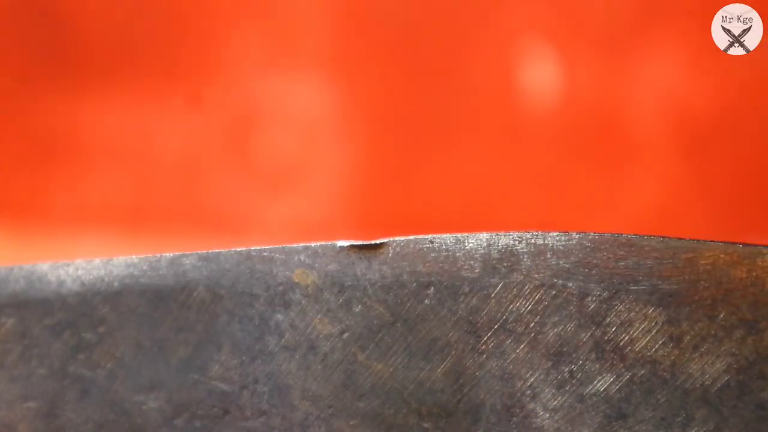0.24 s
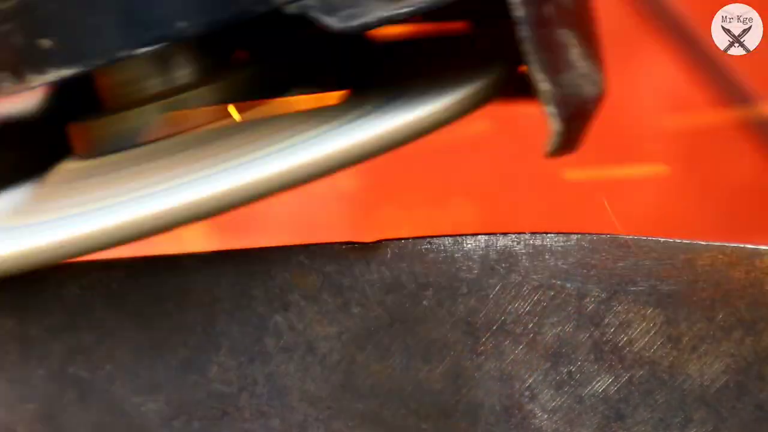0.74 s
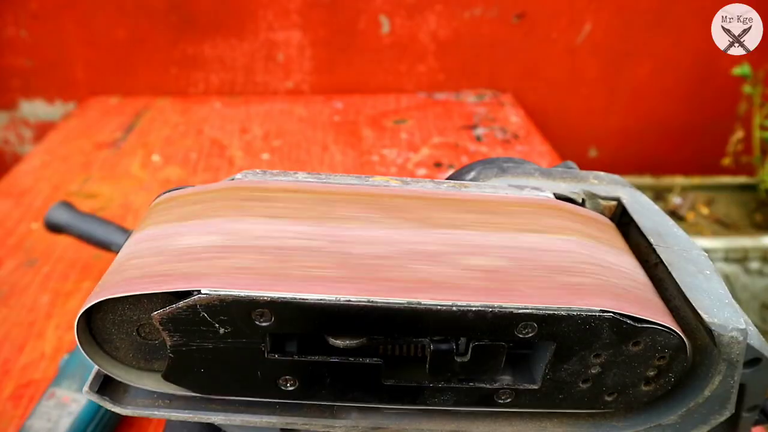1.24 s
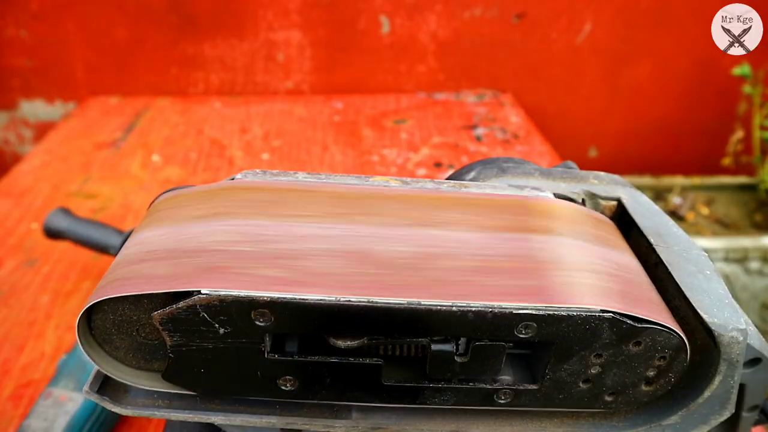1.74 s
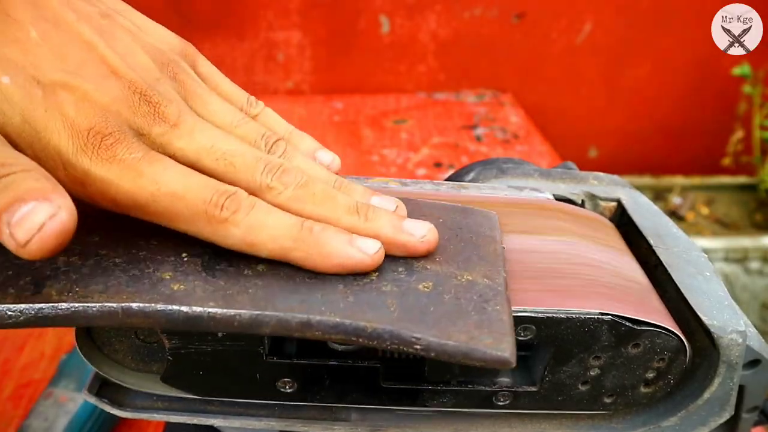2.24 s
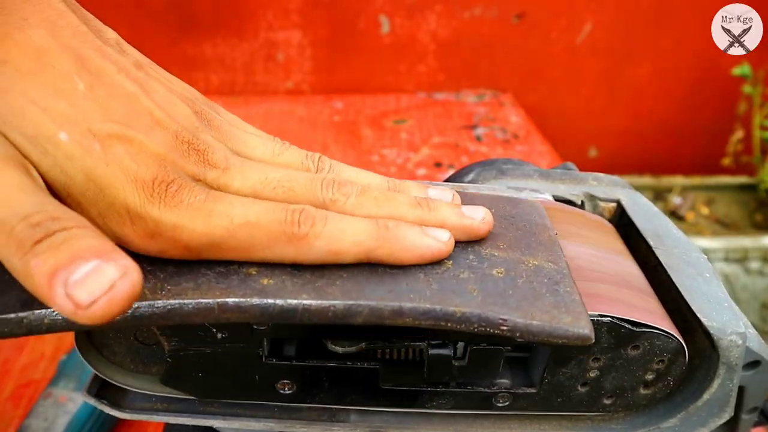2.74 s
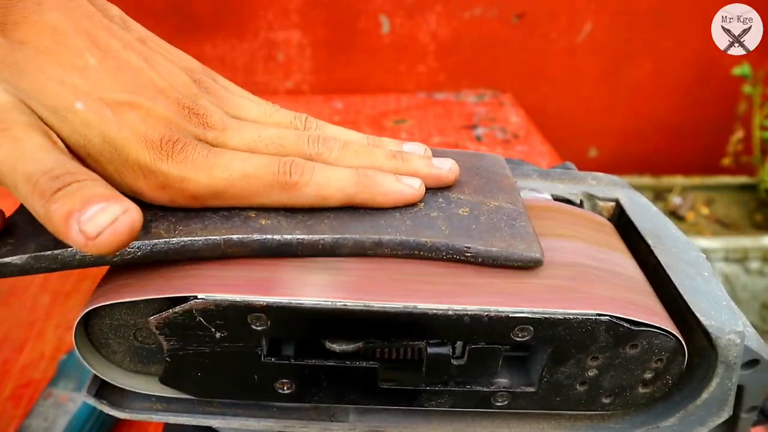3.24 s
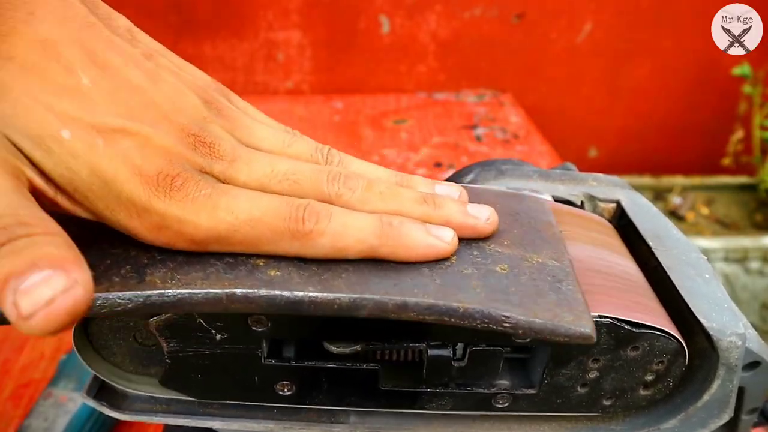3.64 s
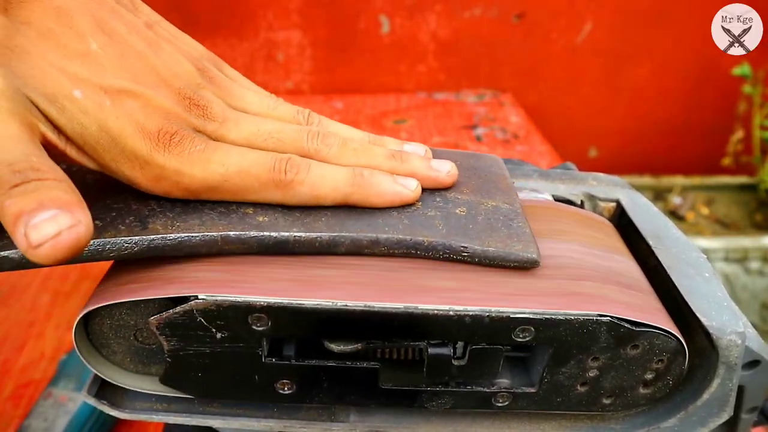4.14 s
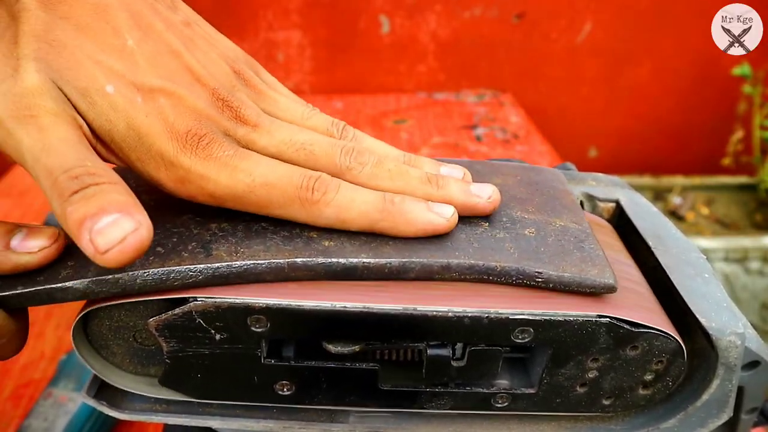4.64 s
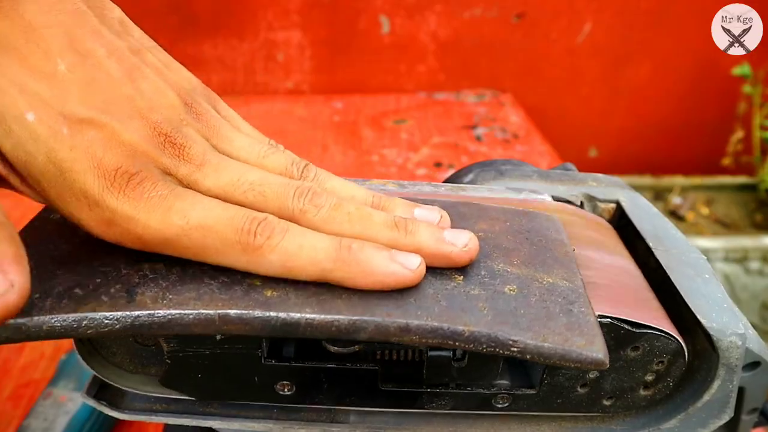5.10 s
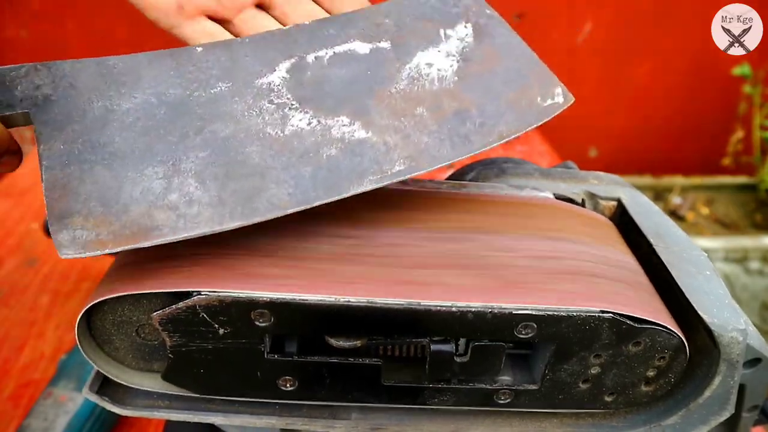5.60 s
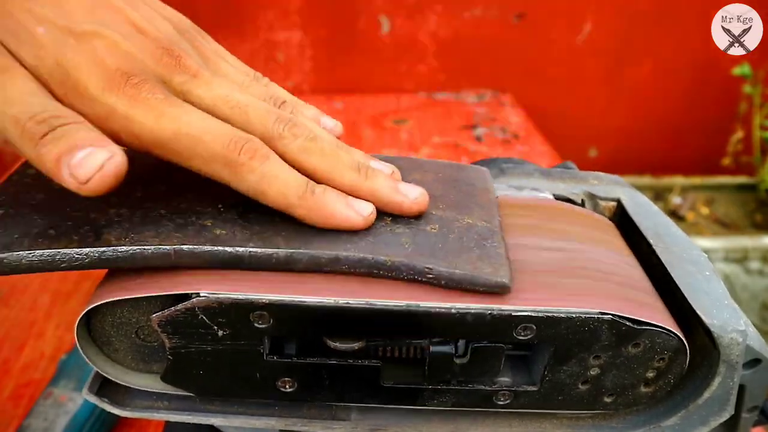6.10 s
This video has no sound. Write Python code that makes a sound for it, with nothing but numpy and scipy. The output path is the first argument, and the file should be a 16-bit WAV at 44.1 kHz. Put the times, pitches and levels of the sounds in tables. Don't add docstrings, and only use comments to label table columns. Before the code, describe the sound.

An angle grinder whirrs and rasps a ringing steel blade twice, then a belt sander whines and roars, bogging down as a blade is pressed on.

```python
import sys
import numpy as np
from scipy import signal
from scipy.fft import rfft, irfft
from scipy.io import wavfile
from scipy.ndimage import uniform_filter1d, map_coordinates

SR = 44100
rng = np.random.default_rng(int(sys.argv[2]) if len(sys.argv) > 2 else 0)


def rack_gain(trim_db):
    fader = np.asarray(trim_db, float)
    return 10 ** (fader / 20)


def wav_record(signal):
    frames = np.transpose(np.atleast_2d(signal))
    bounded = np.clip(frames, -1, 1)
    quanta = np.round(bounded * 32767).astype(np.int16)
    wavfile.write(sys.argv[1], SR, quanta)


N = 280476
TIME = np.arange(N) / SR
GRINDER_END_S, SANDER_START_S = 1.0285, 1.0372
SETTLE_S = .32
FLUTTER_DB, LOW_FLUTTER_DB = 1.25, .9
THROB_HIGH_DB = (1.8, .7)
LOCKED_HZ = 3700

# [start_s, pressure_db, low_rasp_db (relative)]
STROKES = [
    [(0.0, -28.5, -15), (0.044, -40, -15), (0.114, -39, -21), (0.128, -34, -23), (0.134, -52, -20),
     (0.15, -41, -22), (0.16, -62, -6)],
    [(0.556, -34, 2), (0.628, -33, 4.5), (0.65, -32, -5), (0.675, -31.5, -8), (0.878, -32, -5.5),
     (0.912, -39.5, 1), (0.93, -34.5, -23), (0.978, -35.5, -18), (0.998, -60, -10)],
]
# [time_s, turns_per_s]
DISC = [(0, 107.5), (.03, 105.2), (.06, 103), (.085, 102.8), (.12, 104.5), (.16, 106), (.555, 122.5),
        (.607, 120), (.637, 117.7), (.68, 113), (.742, 105.2), (.8, 100.5), (.84, 98.6), (.89, 96.5),
        (1.0, 97)]
# [pitch_hz, likeness (1 = same)]
GRINDER_SAME = [(60, 1), (1400, 1), (2200, .97), (3000, .92), (4300, .65), (6000, .3), (8000, -.1),
                (14000, -.7)]
# [pitch_hz, left_minus_right_db]
SANDER_LEAN = [(130, 0), (235, 2), (380, -0.5), (630, 1), (1380, 3), (3030, -1), (6640, -0.5), (14600, 1)]
# [time_s, tooth_mesh_hz]
MESH = [(1.04, 2208), (1.8, 2215), (2.11, 2217), (2.3, 2147), (2.5, 2098), (2.8, 2048), (3.0, 2032),
        (3.6, 2015), (4.15, 2006), (4.4, 1971), (4.68, 1991), (5.185, 1980), (5.23, 2068), (5.322, 2149),
        (5.466, 2195), (5.68, 2221), (6.06, 2224), (6.36, 2134)]
# [laid_down_s, lifted_s]
PRESSES = [
    (2.13, 5.17),
    (6.08, 6.5),
]
# [start_s, peak_db, pitch_hz]
SLAPS = [(1.054, -20, 615), (1.104, -14, 1170), (1.129, -17, 716), (1.365, -15, 816), (1.473, -29, 789),
         (1.516, -14, 770), (1.596, -15, 766), (1.683, -13.5, 1150), (1.913, -15, 805), (1.967, -15, 780),
         (2.075, -19, 730), (2.098, -21, 748), (2.282, -21, 720), (2.37, -18, 900), (2.456, -16, 1060),
         (2.495, -14, 766), (2.683, -17, 890), (2.708, -28, 1130), (2.989, -16, 1180), (3.021, -12.5, 1070),
         (3.053, -16, 1090), (3.153, -16, 750), (3.242, -19, 730), (3.272, -16, 1190), (3.336, -12, 760),
         (3.4, -13, 1050), (3.7, -11, 790), (3.731, -19, 780), (3.751, -19, 1050), (3.847, -12.5, 814),
         (3.935, -13, 1180), (4.004, -12, 825), (4.075, -12, 1120), (4.105, -19, 1180), (4.166, -14, 1040),
         (4.23, -14, 770), (4.465, -11, 1190), (4.527, -14, 790), (4.569, -13, 785), (4.602, -17, 800),
         (4.861, -14, 777), (4.958, -14, 710), (5.232, -9.5, 1080), (5.258, -16, 710), (5.287, -19, 800),
         (5.342, -16, 897), (5.393, -15, 990), (5.582, -10, 755), (5.65, -11, 710), (5.677, -17, 1010),
         (5.838, -18, 1020), (5.931, -17, 1030), (5.983, -17, 740), (6.12, -26, 770), (6.208, -25, 774),
         (6.277, -24, 1120)]


def evened(x):
    return x / np.sqrt(np.mean(x ** 2) + 1e-20)


def read(points, hz):
    f, value = np.transpose(points)
    return np.interp(np.log(hz + 1), np.log(f + 1), value)


def columns(rows, at=TIME):
    first, *rest = np.transpose(rows)
    return [np.interp(at, first, c) for c in rest]


def curve(rows, t=TIME):
    return columns(rows, t)[0]


def add(mix, s, sound):
    start = round(s * SR)
    mix[:, start:start + sound.shape[1]] += sound


def high_pass(x, hz):
    return signal.sosfilt(signal.butter(2, hz, "high", fs=SR, output="sos"), x)


def wander(per_s, size=N):
    steps = rng.standard_normal(int(size / SR * per_s) + 3)
    return map_coordinates(steps, [np.arange(size) / SR * per_s], order=3)


def complex_wander(per_s, size=N):
    return wander(per_s, size) + 1j * wander(per_s, size)


def swell(s, spread_s):
    return np.exp(-.5 * ((TIME - s) / spread_s) ** 2)


def noise(colour_db, same, lean, patchy_db, size=N, wide=10):
    frames = size // 256 + 5
    hz = np.fft.rfftfreq(1024, 1 / SR)[:, None]
    a, b, c, d, patches = rng.standard_normal((frames, 513, 5)).T
    patches = uniform_filter1d(patches, size=wide, axis=0)
    patches = evened(uniform_filter1d(patches, size=10, axis=1))
    like = np.clip(read(same, hz), -1, 1)
    tilt = rack_gain(read(lean, hz) / 2)
    left = a + 1j * b
    right = like * left + np.sqrt(1 - like ** 2) * (c + 1j * d)
    z = np.array([left * tilt, right / tilt])
    z *= rack_gain(colour_db(np.arange(frames) * 256 / SR, hz) + patchy_db * patches)
    return signal.istft(z, nperseg=1024, noverlap=768)[1][:, :size]


def flutter():
    return np.cos(2 * np.pi * SR / 1024 * TIME + 2.15)


def knocks(rows):
    out = np.zeros(N)
    for s, db, hz, cycles in rows:
        u = np.arange(int(5 * cycles / hz * SR)) * hz / SR
        blow = high_pass(np.sin(2 * np.pi * u) * np.exp(-2 * u / cycles), hz / 3)
        out[round(s * SR):][:len(u)] -= rack_gain(db) * blow / abs(blow).max()
    return out


def handling_thumps():
    # [start_s, peak_db, pitch_hz, length_cycles]
    thump_rows = [
        (1.41, -46, 130, 1.),
        (2.27, -44, 170, 1.),
        (2.962, -29, 220, 1.),
        (3.692, -41, 170, 1.),
        (3.96, -29, 220, 1.),
        (4.205, -39, 200, 1.),
        (4.69, -45, 170, 1.),
    ]
    return rack_gain(np.array([[2.5], [-2.5]])) * knocks(thump_rows)


def grinder_knocks():
    # [start_s, peak_db, pitch_hz, length_cycles]
    knock_rows = [(.207, -29, 3290, 1.3), (.232, -29, 2520, 1.3), (.276, -27, 3330, 1.3),
                  (.326, -27, 2550, 1.3), (.305, -24, 3000, 1.2), (.400, -22, 3040, 1.6),
                  (.552, -27, 1500, 1.3), (.5578, -12.5, 850, 1.05), (.5995, -23, 750, 1.2),
                  (.622, -25, 750, 1.5), (1.0378, -18, 1200, 1.05)]
    return knocks(knock_rows)


def grit(colour, size, patchy_db=2.5, wide=10, same=GRINDER_SAME):
    # [pitch_hz, left_minus_right_db]
    grinder_lean = [(60, 0), (14000, 0)]
    return evened(noise(lambda _, hz: read(colour, hz), same, grinder_lean, patchy_db, size, wide))


def high_spot(size):
    # [time_s, level_db]
    spot_level = [(0, -39), (.025, -44), (.08, -37), (.095, -39), (.13, -42), (.15, -49), (.16, -62),
                  (.553, -62), (.56, -48), (.65, -39), (.7, -41), (.88, -50), (.91, -62)]
    t = TIME[:size]
    angle = 2 * np.pi * np.cumsum(curve(DISC, t)) / SR - 1
    blows = np.zeros(size)
    for k in range(13, 24):
        blows += rack_gain(2.5 * wander(20, size)) * np.cos(k * angle + .5 * wander(25, size))
    return rack_gain(curve(spot_level, t)) * evened(blows)


def whirr(size):
    # [time_s, level_db]
    whirr_level = [(0.0, -31), (0.15, -34), (0.2, -42.5), (0.21, -36), (0.35, -31), (0.438, -29),
                   (0.524, -28.5), (0.53, -34.5), (0.55, -30), (0.56, -28.5), (0.985, -44), (1.028, -40)]
    # [pitch_hz, level_db (per Hz)]
    whirr_colour = [(60, -58), (300, -30.5), (700, -15), (1400, -10), (2300, -9.5), (3400, -7), (5000, -14),
                    (7000, -23.5), (10500, -35), (15000, -41)]
    t = TIME[:size]
    touching = sum((t > rows[0][0]) & (t < rows[-1][0] - .02) for rows in STROKES)
    level_db = curve(whirr_level, t) - 7 * uniform_filter1d(touching * 1., size=400)
    return rack_gain(level_db + FLUTTER_DB * flutter()[:size]) * grit(whirr_colour, size, 1.8, wide=3)


def disc_orders(colour, t, same):
    size = len(t)
    speed = curve(DISC, t)
    turns = np.cumsum(speed) / SR
    out = np.zeros((2, size))
    for k in range(1, 70):
        waver = 1 + 0.89 * complex_wander(25, size)
        like = read(same, k * speed.mean())
        split = np.sqrt((1 - like) / (1.001 + like)) * 1j * np.array([[1], [-1]])
        tone = np.exp(2j * np.pi * (k * turns + rng.random()))
        tone = (tone * (waver + split) / np.sqrt(1 + abs(split) ** 2)).real
        out += rack_gain(read(colour, k * speed) + 2.5 * wander(14, size)) * tone
    return evened(out)


def resonate(x, hz, width):
    r = np.exp(-np.pi * width / SR)
    return signal.lfilter([1 - r, 0, r - 1], [1, -2 * r * np.cos(2 * np.pi * hz / SR), r * r], x)


def stroke(rows, same):
    # [pitch_hz, level_db (per Hz)]
    flat_colour = [(20, 0), (20000, 0)]
    # [pitch_hz, level_db (per Hz)]
    grit_colour = [(800, -45), (1500, -20), (2500, -8), (4500, -6), (7000, -5.5), (8000, -9),
                   (10500, -10.5), (15000, -28)]
    # [pitch_hz, level_db (per Hz)]
    rasp_colour = [(40, -67), (120, -21), (330, -1.5), (900, -10), (1800, -4), (2500, -11.5), (3250, -40),
                   (5500, -100)]
    # [pitch_hz, width_hz, level_db]
    blade_modes = [(1770, 90, -3), (2270, 120, -5), (2770, 38, -3), (3590, 79, -6), (4130, 45, 0),
                   (4970, 34, -1), (6350, 58, -5), (6750, 70, -8), (8130, 30, -18), (8750, 50, -24)]
    t = np.arange(rows[0][0], rows[-1][0], 1 / SR)
    size = len(t)
    press_db, rasp_db = columns(rows, t)
    bump = 1 + .5 * np.cos(2 * np.pi * np.cumsum(curve(DISC, t)) / SR)
    grit_orders = [disc_orders(grit_colour, t, same) for _ in range(2)]
    push = bump * grit(flat_colour, size, same=same) + rack_gain(2) * grit_orders[0]
    hiss = evened(grit(grit_colour, size, 4, wide=2, same=same) + rack_gain(1) * grit_orders[1])
    rasp = bump * grit(rasp_colour, size, same=same) + rack_gain(-4) * disc_orders(rasp_colour, t, same)
    ring = np.zeros((2, size))
    for hz, width, db in blade_modes:
        ring += rack_gain(db + 2.2 * wander(25, size)) * resonate(push, hz, .7 * width)
    sound = rack_gain(-3) * evened(ring) + rack_gain(-2) * hiss + rack_gain(rasp_db) * evened(rasp)
    return rack_gain(press_db) * sound * signal.windows.tukey(size, 0.0022 * SR / size)


def sing(s, length, hz, db, same):
    size = round(length * SR)
    speed = curve(DISC, s + np.arange(size) / SR)
    locked_below_hz = LOCKED_HZ if s < STROKES[0][-1][0] else 2500
    if hz < locked_below_hz:
        pitch = round(hz / speed[size // 2]) * speed
    else:
        pitch = hz * np.linspace(1.002, .998, size)
    waver = 1 + .5 * complex_wander(1.6 * 36, size)
    split = np.sqrt((1 - same) / (1 + same)) * 1j * np.array([[1], [-1]])
    turn = np.exp(2j * np.pi * np.cumsum(pitch) / SR)
    depth = .5 if hz < LOCKED_HZ else .32
    beat = 1 + depth * np.cos(2 * np.pi * (np.cumsum(speed) / SR + rng.random()))
    tone = evened(beat * (turn * (waver + split)).real) * np.sqrt(1 + abs(split) ** 2)
    fade_db = -4 * np.linspace(-.5, .5, size)
    return rack_gain(db + 1.5 + fade_db) * tone * signal.windows.tukey(size, .4)


def chance_singing():
    rows = []
    for table in STROKES:
        start, end = table[0][0], table[-1][0]
        count = round(170 * (end - start))
        when, span, pitch, weak = rng.random((count, 4)).T
        length = .04 + .08 * span
        rows += zip(start + when * (end - start - length), length, 1500 + 5500 * pitch, -49 - 5 * weak)
    return rows


def grinder():
    # [start_s, length_s,
    # pitch_hz, level_db]
    singing_rows = [(.01, .085, 1755, -37.5), (.015, .07, 2180, -40.5), (0, .075, 3640, -42),
                    (.02, .08, 6190, -41), (.092, .045, 2295, -38.5), (.075, .065, 1565, -42),
                    (.095, .045, 3530, -43), (.505, .022, 3550, -35), (.553, .1, 1780, -36),
                    (.618, .03, 4120, -34), (.64, .035, 3580, -38), (.685, .065, 2770, -37.5),
                    (.712, .12, 2265, -40), (.69, .03, 4760, -39), (.7, .11, 4140, -41),
                    (.735, .1, 4970, -40), (.845, .045, 4970, -35), (.84, .06, 4140, -36.5),
                    (.91, .045, 2960, -38), (.925, .075, 6357, -39.5), (.91, .09, 4940, -40),
                    (.62, .26, 12300, -66), (.9, .09, 11400, -66), (.015, .04, 3260, -42),
                    (0, .095, 2800, -40), (0, .13, 5360, -45), (0, .155, 6350, -44), (0, .1, 6820, -45),
                    (.09, .05, 4990, -44), (.86, .045, 8130, -52),
                    (.67, .04, 460, -44), (.665, .025, 890, -42), (.688, .025, 990, -38), (.715, .02, 830, -43),
                (.745, .045, 815, -44), (.74, .06, 430, -45), (.8, .07, 795, -45), (.81, .06, 445, -46),
                (.59, .05, 715, -41), (.59, .04, 360, -42), (.945, .04, 1205, -47), (.085, .06, 1875, -41),
                (.09, .05, 2195, -43), (.095, .06, 1670, -41), (.56, .07, 2790, -41),
                (.575, .05, 4790, -41), (.65, .05, 1780, -41), (.9, .04, 4870, -38),
                    (.115, .042, 6350, -44), (.135, .04, 3520, -46), (.16, .04, 2800, -50),
                   (.205, .03, 3250, -45), (.04, .05, 3500, -42), (.27, .04, 2650, -46),
                   (.33, .05, 3200, -44), (.385, .05, 2100, -43), (.39, .05, 4000, -44),
                   (.42, .05, 3500, -41), (.445, .04, 1990, -41), (.43, .04, 1350, -44),
                   (.48, .05, 2000, -43), (1.01, .018, 2800, -49), (.94, .06, 2770, -45),
                   (.575, .05, 4130, -42), (.64, .06, 4900, -41), (.6, .05, 3280, -43),
                   (.77, .08, 5000, -41)]
    # [pitch_hz, likeness]
    near_same = [(60, 1), (700, .995), (1270, .94), (2330, .74), (4290, .56), (6300, .5), (8000, -.5),
                 (14000, -.5)]

    def likeness(s):
        return near_same if s >= STROKES[1][0][0] - .002 else GRINDER_SAME

    size = round(GRINDER_END_S * SR)
    out = np.zeros((2, N))
    add(out, 0, whirr(size) + high_spot(size))
    for rows in STROKES:
        start = rows[0][0]
        add(out, start, stroke(rows, likeness(start)))
    for s, length, hz, db in singing_rows + chance_singing():
        add(out, s, sing(s, length, hz, db, read(likeness(s), hz)))
    return high_pass(out, 110)


def pressed():
    firm = np.zeros(N)
    for down, up in PRESSES:
        firm += np.clip(np.minimum((TIME - down) / SETTLE_S, 1 - (TIME - up) / .03), 0, 1)
    return firm


def between(pair):
    return pair[0] + (pair[1] - pair[0]) * pressed()


def heavy(t=TIME):
    return np.clip((2010 - curve(MESH, t)) / (2010 - 1995), 0, 1)


def throb():
    # [time_s, turns_per_s]
    roller_speed = [(1.04, 39.54), (1.6, 37.99), (2.12, 39.03), (2.35, 32.68), (2.7, 32.42), (3.2, 31.62),
                    (3.7, 31.49), (4.15, 31.01), (4.45, 29.53), (4.8, 31.04), (5.12, 28.7), (5.3, 36.03),
                    (5.55, 38.94), (5.9, 39.41), (6.36, 35.78)]
    angle = 2 * np.pi * np.cumsum(curve(roller_speed)) / SR - .55
    return np.cos(angle) * (1 + .3 * wander(8))


def slaps():
    out = np.zeros((2, N))
    swell_cycles = 2.2
    for s, db, hz in SLAPS:
        u = np.arange(int(7 * swell_cycles / hz * SR)) * hz / SR
        envelope = u / swell_cycles * np.exp(1 - u / swell_cycles)
        level = rack_gain(db - 8.5 + np.array([[1.1], [-1.1]]))
        add(out, s, level * np.sin(2 * np.pi * u) * envelope)
    return out


def belt_colour(t, hz):
    # [pitch_hz, level_db (per Hz)]
    free_colour = [(18, -97), (30, -34), (167, -31), (240, -14.5), (304, -21), (384, -11), (437, -17),
                   (754, -4.5), (1650, -13), (2190, -6.5), (2490, -11), (4540, -12.5), (4900, -17.5),
                   (9150, -36), (15000, -55.5)]
    # [pitch_hz, level_db (per Hz)]
    loaded_colour = [(18, -72.5), (30, -41.5), (222, -22.5), (281, -20.5), (346, -12.5), (404, -16.5),
                     (774, -4), (953, -9.5), (1200, -7), (1440, -14), (2030, -5), (2430, -12), (4090, -12),
                     (9640, -34), (15000, -52)]
    # [pitch_hz, width_hz, bump_db]
    housing_bumps = [(714, 245, 3.5), (1130, 310, 5.5), (2225, 68, 3.5), (3480, 300, 4), (4285, 340, 7),
                     (5480, 1200, 5), (8750, 180, 3)]
    # [pitch_hz, width_hz, bump_db]
    grind_bumps = [(3000, 480, 4.5), (6050, 470, 3)]

    def bumps(rows):
        return sum(db / (1 + (2 * (hz - f) / width) ** 2) for f, width, db in rows)

    load = np.clip((2240 - curve(MESH, t)) / (2240 - 1990), 0, 1)
    colour = (1 - load) * read(free_colour, hz) + load * read(loaded_colour, hz)
    return colour + bumps(housing_bumps) + heavy(t) * bumps(grind_bumps)


def belt():
    # [pitch_hz, likeness]
    sander_same = [(130, 0.91), (290, 1), (630, 0.99), (1380, 0.94), (3030, 0.87), (5400, 0.8),
                   (7900, 0.47), (14600, 0.71)]
    # [time_s, roar_rise_db, hiss_rise_db]
    scuff_rows = [
        (2.21, 2, 4.5),
        (2.35, 0.5, 3),
        (4.49, 1.5, 1.5),
        (6.21, 2.5, 2.5),
    ]
    roar_db, hiss_db = between((-28.5, -28.5)), between((-47, -44.5))
    for s, roar_up, hiss_up in scuff_rows:
        roar_db = roar_db + roar_up * swell(s, 0.029)
        hiss_db = hiss_db + hiss_up * swell(s, 0.029)
    for down, _ in PRESSES:
        roar_db = roar_db - 1.06 * swell(down + SETTLE_S / 2, SETTLE_S / 2)
    roar = noise(belt_colour, sander_same, SANDER_LEAN, 1.0)

    def below(hz):
        return signal.sosfiltfilt(signal.butter(2, hz, fs=SR, output="sos"), roar)

    def level(x):
        return np.sqrt(uniform_filter1d((x ** 2).mean(0), size=12000))

    bass, middle, upper, high = below(490), below(1380), below(3900), below(6450)
    top = roar - high
    swing, quiver = throb(), flutter()
    jolts = sum(swell(s + 0.0022, 0.0022) for s, *_ in SLAPS)
    shake = FLUTTER_DB * quiver + jolts
    body = bass + rack_gain(2.5 * swing + LOW_FLUTTER_DB * quiver + 0.3 * wander(130)) * (middle - bass)
    body += rack_gain(.9 * swing + shake) * (upper - middle)
    body += rack_gain(between(THROB_HIGH_DB) * swing + shake) * (high - upper)
    hiss_db = hiss_db + 0.93 * FLUTTER_DB * quiver + 0.88 * wander(60)
    belt_noise = rack_gain(roar_db - 2) * body / level(middle) + rack_gain(hiss_db) * top / level(top)
    return rack_gain(0.66 * wander(75)) * belt_noise


def whine(hz, db, rough, per_s, apart=0.11):
    sides = np.array([[1], [-1]])
    shared = 1 + rough * complex_wander(per_s)
    split = apart * (wander(30) + 1j * wander(8)) * sides
    turn = np.exp(2j * np.pi * (np.cumsum(hz) / SR + rng.random()))
    lean = rack_gain(read(SANDER_LEAN, hz.mean()) * sides / 2)
    return np.sqrt(2 / (1 + 2 * rough ** 2)) * rack_gain(db) * lean * (turn * (shared + split)).real


def motor():
    # [mesh_hz, mesh_db, second_mesh_db, shaft_db, sideband_db]
    gearing = [(1972, -41, -46, -58, -42), (1984, -39, -37.5, -55, -38), (1997, -41, -45, -55, -37.5),
               (2009, -34, -32.5, -58, -36), (2045, -30.3, -30.5, -54, -36),
               (2085, -26.8, -30.5, -45.5, -36.5), (2140, -28.5, -33.5, -43, -47),
               (2190, -27.5, -33, -41, -42), (2209, -31.5, -36, -40.5, -44), (2221, -28.3, -36, -40, -44)]
    # [shaft_order, level_db]
    sidebands = [(8, -9), (10, 0.5), (17, -21), (19, -25), (20, -22), (36, -43)]

    def drift(db):
        return db + .6 * wander(5)

    mesh = curve(MESH)
    shaft, bars = mesh / 9, mesh * 2.081
    firm, smear = pressed(), .62 * heavy()
    first_down, first_up = PRESSES[0]
    even_start_s, even_end_s = 4.77, 5.19
    steady = uniform_filter1d(1. * (TIME > even_start_s) * (TIME < even_end_s), size=900)

    mesh_db, second_db, shaft_db, side_db = map(drift, columns(gearing, mesh))
    for db, (down, _) in zip((-11, -4), PRESSES):
        mesh_db = mesh_db + db * swell(down + .215, .055)
    mesh_db = mesh_db - 1.5 * swell(first_up + .08, .06)
    mesh_db = mesh_db - 9 * swell(SANDER_START_S, 0.055)
    second_db = drift(-41) + (second_db + 41) * np.sqrt(firm)
    second_db = second_db + (drift(-37) - second_db) * steady
    side_db = side_db - 12 * (1 - firm) - 5 * swell(first_down + .3, .1)

    twelve_db = drift(between((-41.5, -41)))
    twelve_db = twelve_db - 9 * (1 - firm) * np.clip(10 * (TIME - 1.7), 0, 1)
    turn_db = drift(between((-37, -39.5)))
    for down, _ in PRESSES:
        turn_db = turn_db - 5.5 * swell(down + .44, .29)
    bars_db = drift(between((-35.5, -46))) - 6 * (steady + swell(even_end_s + .05, 0.046))
    third_db = drift(-64 + 14 * heavy())

    out = whine(mesh, mesh_db, .13 + smear, 70)
    out += whine(2 * mesh, second_db, .19 + smear * (1 - .6 * steady), 90)
    out += whine(3 * mesh, third_db, .9, 120)
    out += whine(shaft + 5 * wander(25), shaft_db, .25, 60, .13)
    out += whine(12 * shaft, twelve_db - 3 * firm, .55, 45)
    for order, db in sidebands:
        out += whine(order * shaft, side_db + db, 0.081 + smear, 60)
    out += whine(17 * shaft, -70 + 29 * swell(even_end_s + .22, .14) ** .3, .3, 50)
    bars_swing_db = between(THROB_HIGH_DB) * throb() + LOW_FLUTTER_DB * flutter()
    out += whine(bars, bars_db - 2.2 + bars_swing_db, .16 + smear, 50)
    out += whine(2 * bars, bars_db - 32, .9, 120)
    return out + whine(bars / 12 + 5 * wander(20), turn_db, .2, 60, .08)


def sander():
    # [pitch_hz, left_lead_radians]
    port_phase = [(0, -0.82), (1980, 0.14), (4390, -0.33), (6460, 0.1), (6890, -0.55), (7240, 0.0),
                  (9220, -0.2), (14700, -0.1)]
    step = read(port_phase, np.fft.rfftfreq(N, 1 / SR)) * np.array([[.5j], [-.5j]])
    rise = np.clip((TIME - SANDER_START_S) / .018, 0, 1)
    return rise * irfft(rfft(motor() + belt()) * np.exp(step), N)


def scene():
    return handling_thumps() + grinder_knocks() + grinder() + slaps() + sander()


def thin_treble(sound):
    # [pitch_hz, share_lost (0-1)]
    usual_loss = [(8000, 0), (9500, .2), (11000, .55), (12500, .72), (14000, .85), (15000, .95)]
    # [pitch_hz, share_lost (0-1)]
    grinding_loss = [(7500, 0), (10000, .15), (10600, .93), (12000, .88), (12800, .96), (15000, .97)]
    left, right = sound
    hz, t, z = signal.stft([left + right, left - right], SR, "cosine", nperseg=2048)
    power = (abs(z[:, :1024]) ** 2 + 1e-20).reshape(2, 256, 4, -1).mean(2)
    cells = uniform_filter1d(np.log(power), size=3, axis=2)
    stands_out = cells - uniform_filter1d(cells, size=25, axis=1)
    rank = stands_out.argsort(axis=2).argsort(axis=2) / len(t)
    centre = hz[2:1024:4, None]
    grinding = (t > .32) & (t < 1.03)
    share = np.where(grinding, read(grinding_loss, centre), read(usual_loss, centre))
    z[:, :-1] *= np.repeat(rank >= share, 4, axis=1)
    return signal.istft(z, SR, "cosine", nperseg=2048)[1][:, :N] / 2


def band_limit(x):
    return signal.sosfilt(signal.butter(12, 15150, fs=SR, output="sos"), x)


def record(dry):
    mid, side = thin_treble(high_pass(dry, 60)) * ((TIME < GRINDER_END_S) | (TIME > SANDER_START_S))
    return band_limit(np.array([mid + side, mid - side]))


dry = scene()
out = record(dry)
wav_record(out)
```